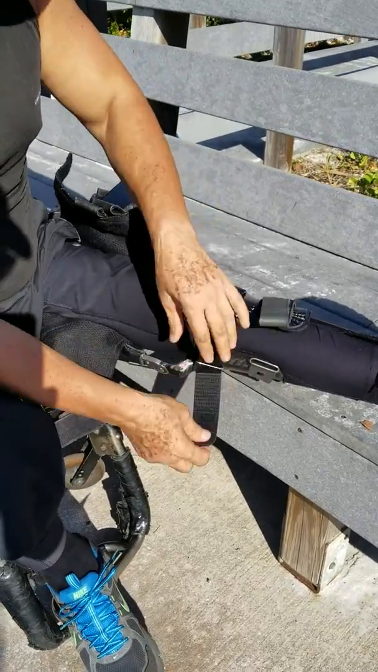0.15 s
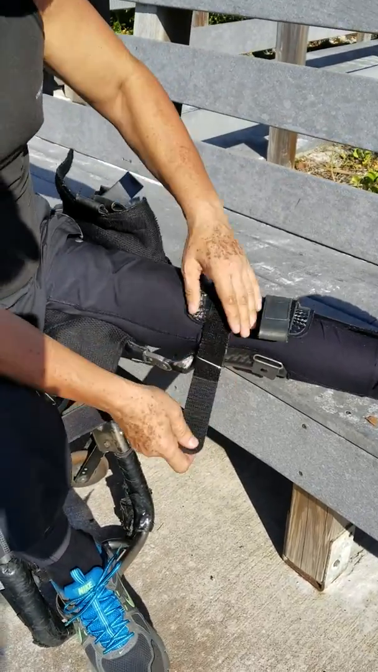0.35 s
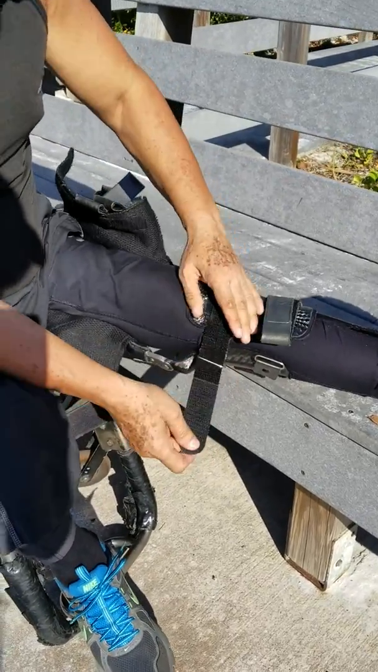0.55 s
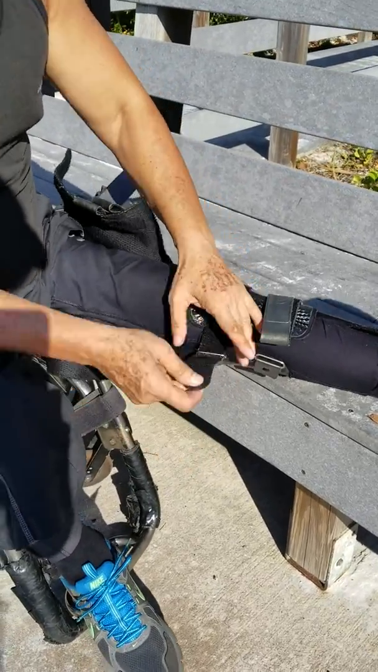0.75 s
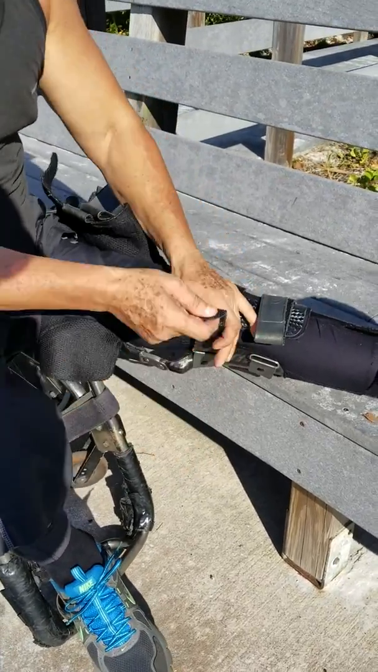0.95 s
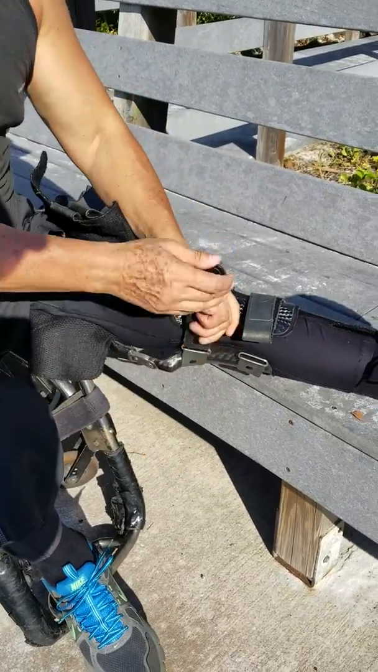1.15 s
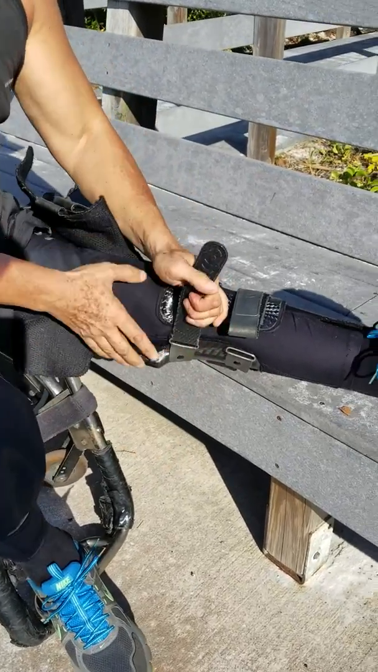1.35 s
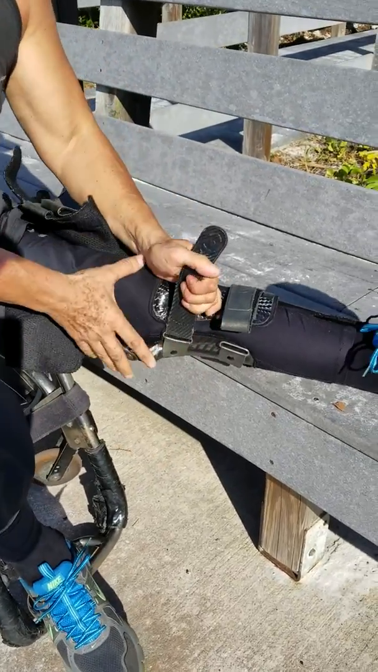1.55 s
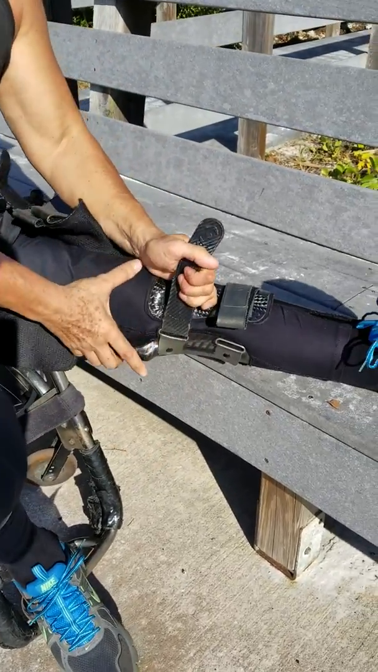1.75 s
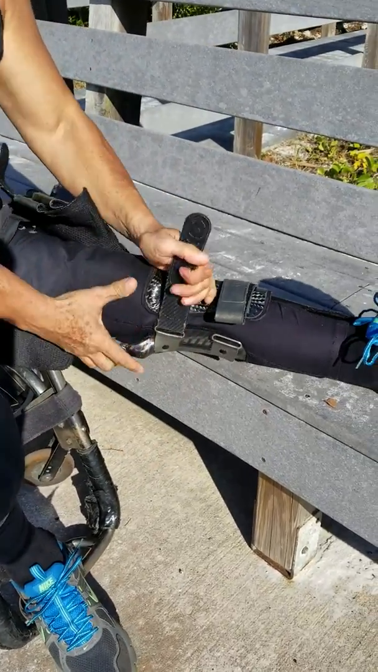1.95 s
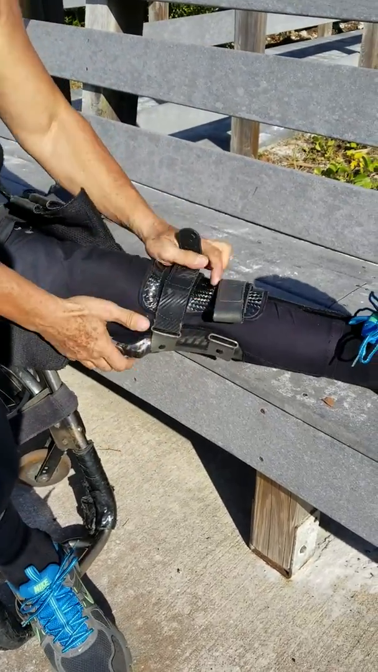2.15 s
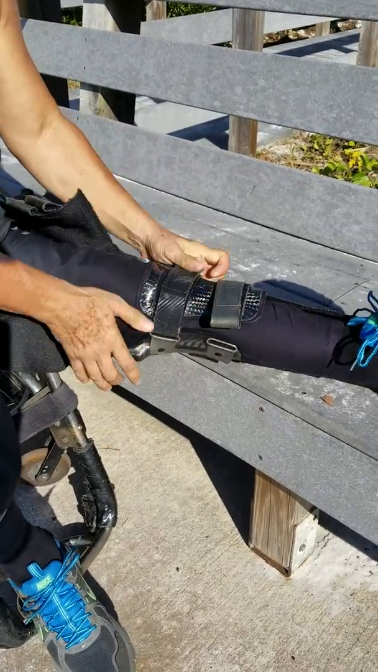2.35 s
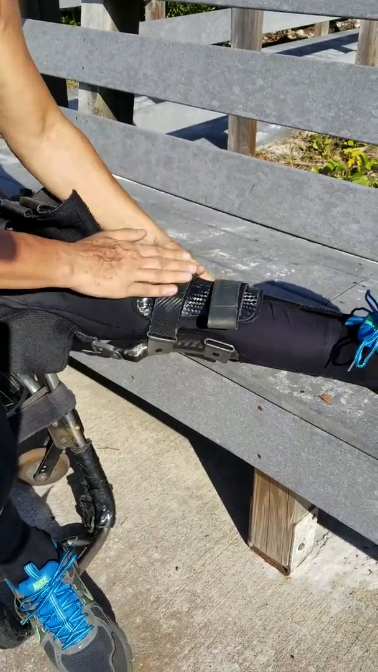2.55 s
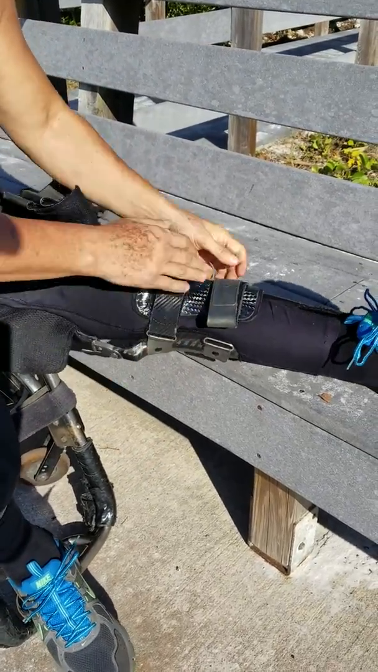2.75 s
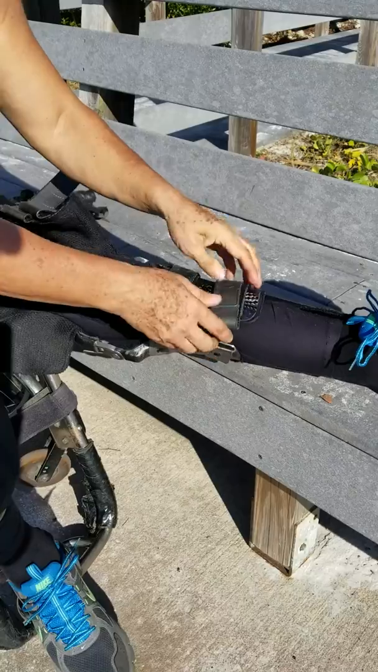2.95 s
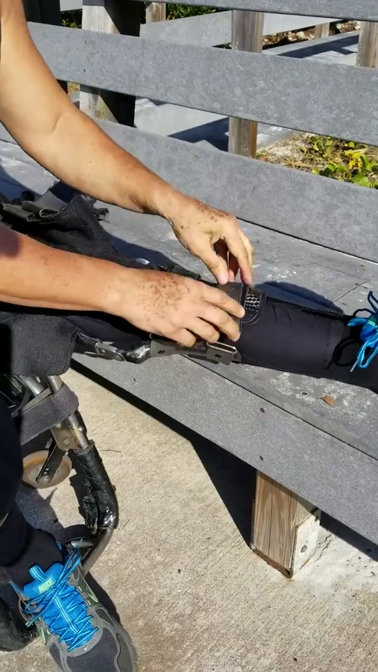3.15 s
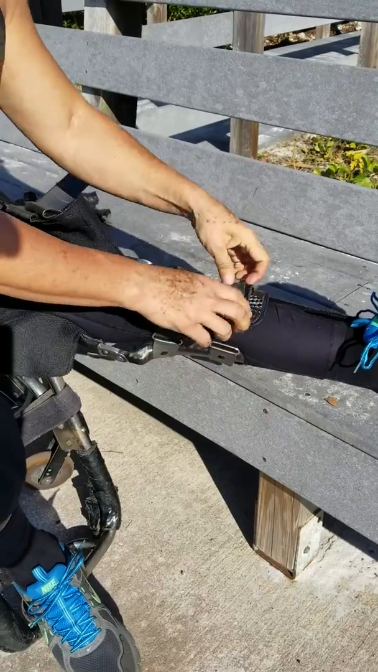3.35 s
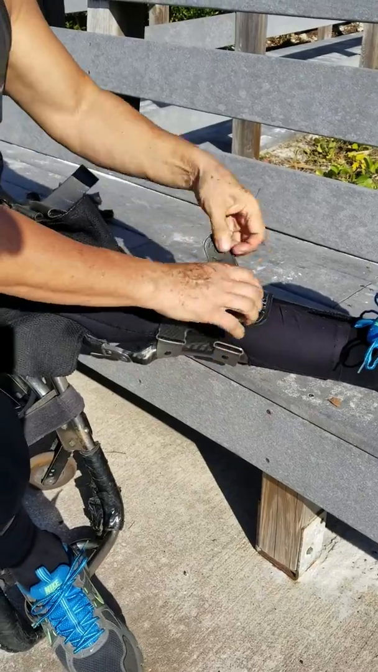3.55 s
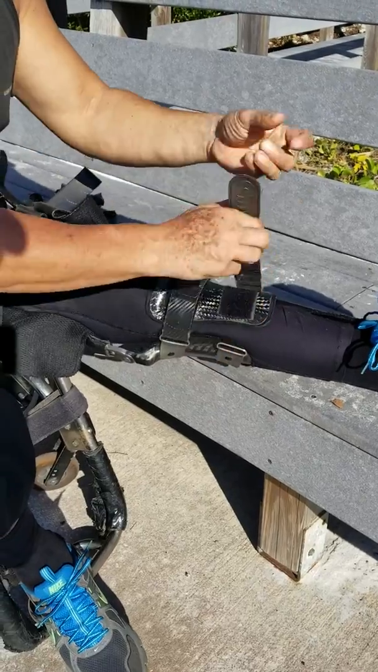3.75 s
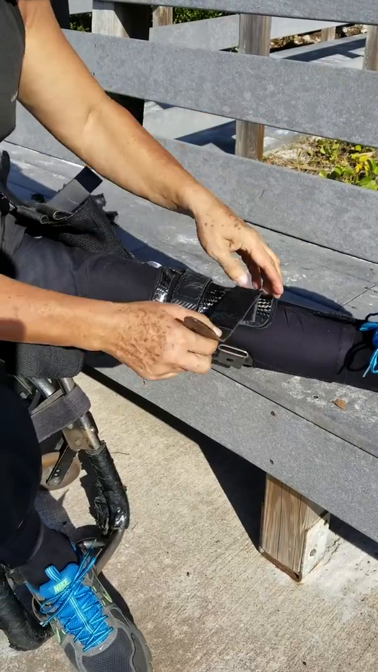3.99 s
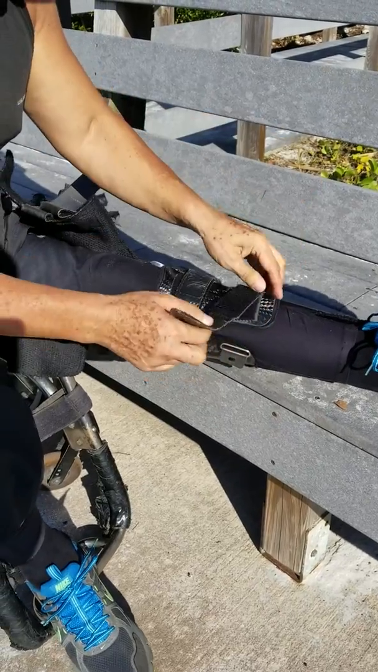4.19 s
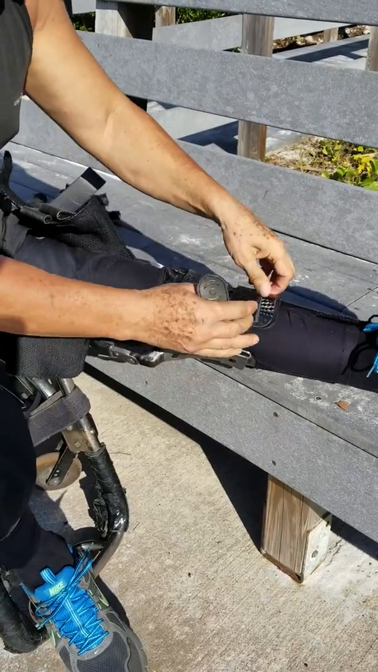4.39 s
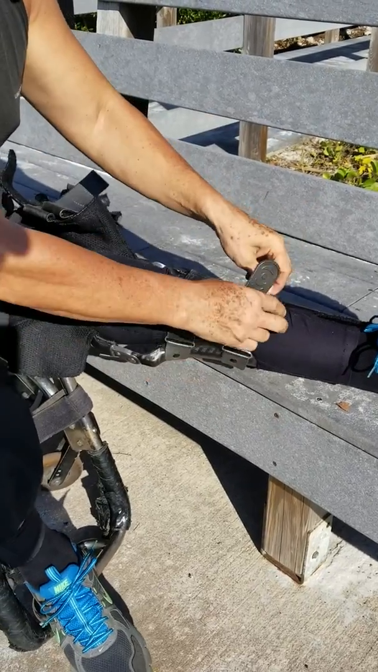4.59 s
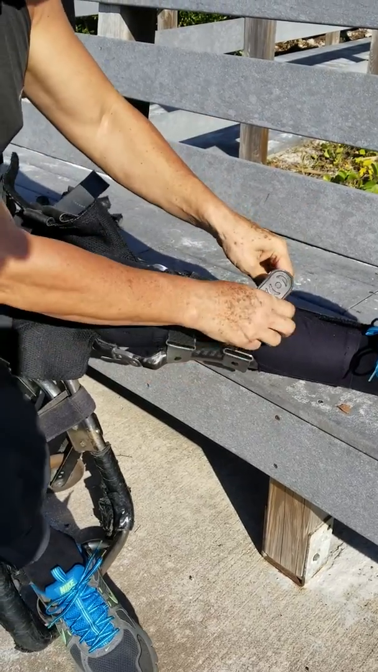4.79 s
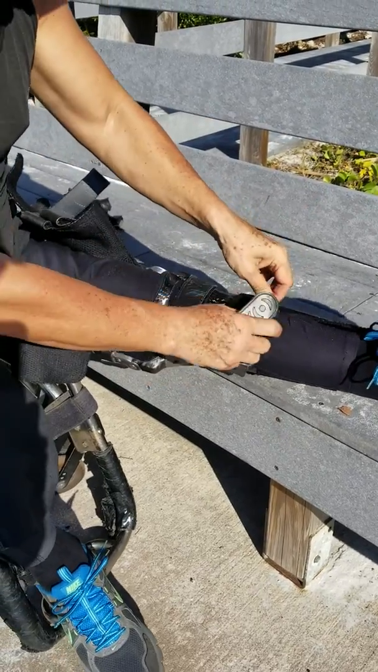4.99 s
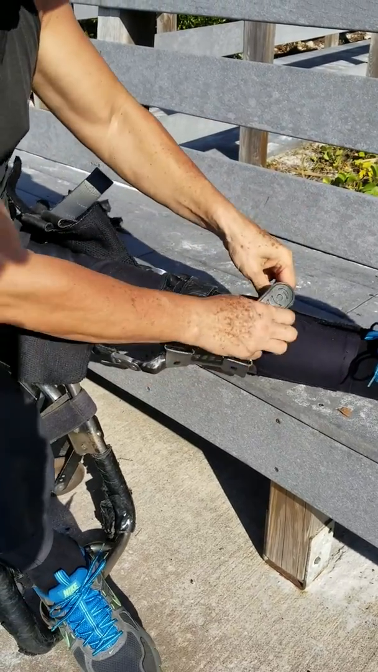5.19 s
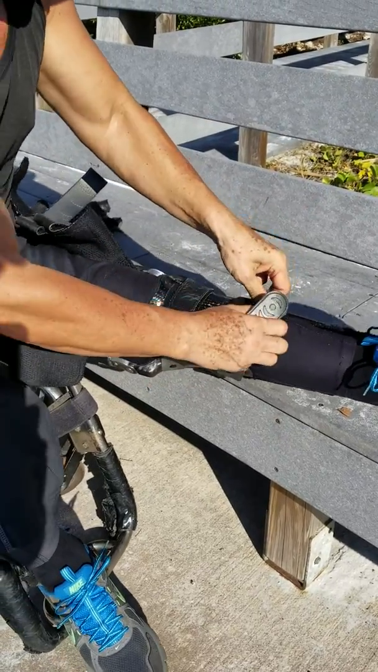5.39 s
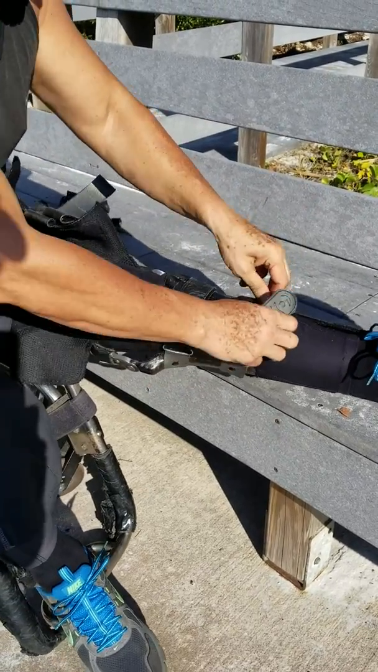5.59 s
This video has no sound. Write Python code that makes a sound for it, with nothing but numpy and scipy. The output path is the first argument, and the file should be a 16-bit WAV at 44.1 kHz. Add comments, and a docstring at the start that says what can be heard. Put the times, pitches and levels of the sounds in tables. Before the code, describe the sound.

The straps of a leg brace are handled close to the microphone, outdoors, over a faint steady low rumble. At the start a hook-and-loop strap peels a little. For the first two seconds webbing slides through its loop with a soft hiss, hands rub trouser cloth and buckles tick lightly. A buckle knocks on the plastic shell at about 2.1 seconds and again, harder, at 2.6. From 3.3 to 3.7 seconds comes the loudest sound, a crackling hook-and-loop rip that gives in jolts, rises in pitch and ends brightly. A faint distant hum swells around 4 seconds while the rubbing and sliding go on. Near 5 seconds there are a few tiny peels and one more sharp knock, then another short peel at 5.3 seconds, with small ticks and rustling until the end at about 5.6 seconds.

```python
"""The hook-and-loop straps of a leg brace are adjusted on an outdoor bench, over a faint distant rumble.
First webbing slides through its loop, hands rub cloth, buckles tick and a strap peels a little.
After two seconds a buckle knocks twice on the plastic shell. At 3.3 s comes one long rip:
a shower of tiny hook snaps that ring the strap and the shell. Then the rubbing and ticking go on,
with a few more small peels and a last knock near five seconds."""
import sys
import numpy as np
from scipy import signal
from scipy.fft import rfft, irfft, next_fast_len
from scipy.io import wavfile
from scipy.ndimage import uniform_filter1d, map_coordinates

SR = 44100
rng = np.random.default_rng(int(sys.argv[2]) if len(sys.argv) > 2 else 0)


def digitize_waveform(pressure):
    """Quantize a signal to 16-bit integers and store it at the path in sys.argv[1].

    Rows of a 2-D input are taken as channels; values are limited to [-1, 1].
    """
    field = np.atleast_2d(pressure).T
    bounded = np.clip(field, -1, 1)
    quanta = np.round(bounded * 32767).astype(np.int16)
    wavfile.write(sys.argv[1], SR, quanta)


N = 248283


def amp(db):
    """Turn decibels into a number to multiply by."""
    return 10 ** (np.asarray(db) / 20)


def unit(x):
    """Scale a signal to an average (rms) level of 1."""
    return x / np.sqrt(np.mean(x ** 2) + 1e-20)


def along(points, hz):
    """Read between (pitch_hz, value) rows, giving each octave equal room."""
    pitches, values = np.transpose(points)
    return np.interp(np.log(hz + 1), np.log(pitches), values)


def wobble(rate):
    """A smooth random curve through `rate` points a second."""
    points = rng.standard_normal(int(N * rate / SR) + 4)
    return map_coordinates(points, [np.arange(N) * rate / SR])


def filtered(x, response):
    """Turn each frequency up or down by response(hz)."""
    n = x.shape[-1]
    padded = next_fast_len(n + 8192)
    return irfft(rfft(x, padded) * response(np.fft.rfftfreq(padded, 1 / SR)), padded)[..., :n]


def coloured(x, colour):
    """Shape the tone of a sound with (pitch_hz, level_db) rows."""
    return filtered(x, lambda hz: amp(along(colour, hz)))


def bands(x, low_hz, high_hz):
    """Split a sound into equally strong low, middle and high parts."""
    below = lambda hz, edge: 1 / (1 + (hz / edge) ** 10)
    splits = [lambda hz: below(hz, low_hz),
              lambda hz: (1 - below(hz, low_hz)) * below(hz, high_hz),
              lambda hz: 1 - below(hz, high_hz)]
    return np.array([unit(filtered(x, split)) for split in splits])


def swell(peak_s, rise_s, fall_s):
    """A rounded rise and fall, 9 dB down at rise_s before its peak and fall_s after it."""
    t = np.arange(N) / SR - peak_s
    away = np.abs(t / np.where(t < 0, rise_s, fall_s))
    gain, near = np.zeros(N), away < 4
    gain[near] = amp(-9 * away[near] ** 1.6)
    return gain


def add(track, start_s, sound):
    """Mix a sound into the track at start_s."""
    part = track[round(start_s * SR):][:len(sound)]
    part += sound[:len(part)]


# How alike the background is on the left and right: pitch_hz, likeness (1 = the same)
STEREO_LIKENESS = [(25, 0.6), (50, 0.98), (70, 0.8), (300, 0.96), (1000, 0.35), (2500, 0.14),
                   (10000, 0.039)]
def wide_noise(colour):
    """Noise from all around: much alike on both sides in the bass, different in the treble."""
    def response(hz):
        angle = np.arccos(np.clip(along(STEREO_LIKENESS, hz), -1, 1)) / 2
        return amp(along(colour, hz)) * [np.cos(angle), np.sin(angle)]
    mid, side = filtered(rng.standard_normal((2, N)), response)
    return unit(np.array([mid + side, mid - side]))


# The tone of the distant rumble and of the open air: pitch_hz, level_db
RUMBLE_COLOUR = [(12, -50.5), (20, -41), (27, -20), (41, 3.5), (49, -7.5), (59, 1.5), (81, 6.5), (107, 4.5),
                 (124, -7.5), (146, -4.5), (186, -7.5), (221, -39), (260, -15), (340, -25), (570, -120)]
AIR_COLOUR = [(150, -15), (320, -2), (520, -17), (850, -14), (1080, -14.5), (1190, -6.5), (1350, -19),
              (2500, -25.5), (5000, -25.5), (15500, -30.5)]
# The notes of a distant hum: pitch_hz, level_db, swell_db
HUM_TONES = [(61.6, -64.5, 2), (138.5, -72, 8.5)]
def background():
    """A low rumble, faint open air and a wavering hum that swells once."""
    t = np.arange(N) / SR
    rise = swell(peak_s=3.96, rise_s=0.47, fall_s=0.48)
    hum = np.zeros(N)
    for pitch_hz, level_db, swell_db in HUM_TONES:
        gain = amp(level_db + swell_db * rise + 2.7 * wobble(3.36))
        hum += gain * np.sin(2 * np.pi * pitch_hz * t + 0.97 * wobble(7.4))
    return amp(-60.5) * wide_noise(RUMBLE_COLOUR) + amp(-71.5) * wide_noise(AIR_COLOUR) + hum


# The tone of nearby echoes, against the direct sound: pitch_hz, level_db
ECHO_COLOUR = [(200, -9.5), (600, -6.5), (1300, 3.5), (3000, 5.5), (8000, 5.5)]
def with_echoes(x, echoes):
    """Add echoes to the direct sound, which reaches the left side just before the right."""
    direct = np.array([np.roll(x, -2), np.roll(x, 2)])
    return direct + coloured(echoes, ECHO_COLOUR)


def snaps(rate, spread_db):
    """Tiny clicks of random size at random moments, about `rate` a second."""
    happens = rng.random(N) < rate / SR
    return happens * rng.choice([-1, 1], N) * amp(spread_db * rng.standard_normal(N).clip(-2, 2))


def scattered(x, fade_s):
    """Each snap comes from its own spot and trails its own echoes, which drop 60 dB in fade_s."""
    fade = amp(-60 * np.arange(SR // 20) / SR / fade_s) ** 2
    energy = np.abs(signal.oaconvolve(x ** 2, fade / fade.sum())[:N])
    return with_echoes(x, np.sqrt(energy) * rng.standard_normal((2, N)))


def tightening(x, pitch_path, lift_db, octaves):
    """A broad ring that follows how tight the strap is, along (time_s, pitch_hz) rows."""
    hz, times, spectrum = signal.stft(x, SR, nperseg=256)
    ring_hz = np.interp(times, *np.transpose(pitch_path))
    away = np.log2((hz[:, None] + 1) / ring_hz) / octaves
    return signal.istft(spectrum * amp(lift_db * np.exp(-away ** 2)), SR, nperseg=256)[1][:, :N]


def flexing(x, depth_db):
    """The tone drifts in patches as the fabric bends and the hands shade it."""
    spectrum = signal.stft(x, nperseg=512)[2]
    patches = uniform_filter1d(rng.standard_normal(spectrum.shape[1:]), size=4, axis=0)  # over pitch
    patches = uniform_filter1d(patches, size=22, axis=1)  # over time
    return signal.istft(spectrum * amp(depth_db * unit(patches)), nperseg=512)[1][:, :N]


# Webbing drawn through its loop: peak_s, rise_s, fall_s, hiss_db, scrape_db (added to hiss_db)
WEBBING_SLIDES = [(.03, 0.07, .08, -67.5, -11.5), (.22, 0.12, 0.028, -65, -9), (.69, 0.19, 0.13, -62.5, -7),
                  (1.11, 0.016, 0.02, -54, -27), (1.17, 0.024, .08, -68, -20), (1.4, .03, 0.045, -66, -26),
                  (1.62, 0.2, 0.19, -73.5, -17), (2.04, 0.14, 0.15, -67, -4),
                  (2.19, 0.091, 0.07, -58.5, -2.5), (2.36, .1, 0.075, -63, -6),
                  (2.51, 0.086, 0.099, -64.5, -2.5), (2.66, 0.039, 0.096, -68.5, 2),
                  (3.075, 0.037, 0.09, -79, 2), (3.8, 0.3, 0.03, -68.5, -3.5),
                  (4.06, 0.062, 0.069, -66.5, -7), (4.241, 0.039, .03, -66.5, -1.5),
                  (4.335, 0.034, 0.038, -61, -5), (4.5, 0.022, 0.12, -70.5, -10.5),
                  (4.608, .012, .02, -70, 10), (4.72, 0.031, 0.072, -64, -5.5),
                  (5.04, 0.29, 0.13, -66.5, -2.5), (5.46, .09, 0.16, -69, -0.5)]
# The webbing rings higher as it is drawn short: time_s, pitch_hz
WEBBING_PITCH = [(0.55, 406), (1.0, 434), (1.10, 510), (1.16, 770), (1.22, 1110), (1.32, 430)]
# A hand rubs the trouser cloth: peak_s, rise_s, fall_s, level_db
HAND_RUBS = [(.12, 0.087, .12, -63), (.555, 0.043, 0.098, -70), (.78, .2, .2, -66), (1.06, .075, .05, -63),
             (1.15, 0.064, 0.076, -58.5), (2.28, 0.28, 0.28, -69), (2.68, 0.081, 0.13, -70.5),
             (3.18, 0.22, 0.55, -70), (3.74, 0.24, 0.1, -71.5), (4.03, 0.085, 0.5, -69.5),
             (4.325, 0.017, 0.025, -66), (4.76, 0.11, 0.13, -70), (5.16, 0.2, 0.15, -68),
             (5.47, 0.11, 0.094, -67.5)]
# The fingers never quite rest: low_db, middle_db, high_db
FIDGET_DB = [-77.5, -80, -83]
# The tone of rubbed cloth: pitch_hz, level_db
CLOTH_COLOUR = [(120, -15.5), (250, 0), (420, 3.5), (700, -4.5), (1150, -7), (2000, -12), (3000, -10),
                (4400, -12.5), (6300, -16.5), (8300, -15.5), (11000, -20), (15800, -21.5)]
def rubs():
    """Fibres catch and slip under hands and webbing: a smooth hiss with a little crackle in it."""
    pressure = amp(2.5 * wobble(22))  # the palm presses unevenly
    hands = pressure * sum(amp(level_db) * swell(*timing) for *timing, level_db in HAND_RUBS)
    palm_bands = amp([[0], [-14.5], [-13]])  # a soft palm gives mostly the low band
    power = amp(FIDGET_DB)[:, None] ** 2 + (palm_bands * hands) ** 2
    for *timing, hiss_db, scrape_db in WEBBING_SLIDES:
        power[1:] += (amp([[hiss_db + scrape_db], [hiss_db]]) * swell(*timing)) ** 2
    fibres = rng.standard_normal(N) + amp(-6) * unit(snaps(160, spread_db=5))
    rub = scattered(fibres * amp(0.64 * wobble(41)), fade_s=0.011)
    rub = tightening(coloured(rub, CLOTH_COLOUR), WEBBING_PITCH, lift_db=8.5, octaves=0.58)
    rub = flexing(rub, depth_db=2.4)
    return np.sum(np.sqrt(power)[:, None] * bands(rub, 810, 3760), axis=0)


# Light ticks of buckles and single hooks: start_s, low_db, middle_db, high_db
TICKS = [(0.0488, -64, -59, -56.5), (0.2114, -74, -53, -60), (.2424, -82, -74, -65),
         (1.595, -78, -87, -62.5), (1.7702, -66, -66.5, -71), (1.8975, -58, -79, -70),
         (2.022, -59.5, -60.5, -67), (2.073, -81, -68, -57.5), (2.365, -82, -75, -52),
         (2.3898, -84, -79, -56), (2.4196, -51, -66, -73), (2.5313, -62, -57, -60),
         (2.7389, -57, -60.5, -72), (3.266, -82, -58, -54), (3.2848, -83, -53, -54.5),
         (3.8332, -69.5, -70, -58), (4.4819, -85, -69, -63), (4.5955, -54.5, -55.5, -65),
         (4.6888, -59, -58, -75), (4.8923, -76, -61, -56), (5.082, -54.5, -65, -78), (5.289, -66, -52, -55),
         (5.308, -53, -53, -48.5), (5.403, -48.5, -55, -63), (5.469, -56, -60, -74),
         (5.5232, -81, -68, -55.5)]
# The tone of a hard contact, for ticks and knocks: pitch_hz, level_db
CRACK_COLOUR = [(200, -16), (700, -10.5), (1300, 1.5), (1850, -3), (2600, 1), (3400, -3), (4200, -3),
                (5300, -12.5), (10000, -14.5), (15500, -21.5)]
def ticks():
    """Small dry contacts: bursts of noise whose treble dies first."""
    track, t = np.zeros(N), np.arange(SR // 12) / SR
    fade_s = np.array([[0.04], [0.03], [0.025]])
    fade = amp(-60 * t / fade_s) * (1 - np.exp(-t / 0.00041))
    for start_s, *levels_db in TICKS:
        burst = bands(coloured(rng.standard_normal(len(t)), CRACK_COLOUR), 1130, 4640)
        add(track, start_s, np.sum(amp(levels_db)[:, None] * fade * burst, axis=0))
    return track


def surroundings(x, near_fade_s, far_fade_s, far_db, poses=4):
    """Echoes from arms, leg and bench follow each tap and shift as the hands move."""
    t = np.arange(SR // 6) / SR
    near, far = rng.standard_normal((2, poses, 2, len(t)))
    near *= amp(-60 * t / near_fade_s)
    far *= amp(-60 * t / far_fade_s) * (1 - np.exp(-t / 0.011))
    tails = (unit(near) + amp(far_db) * unit(far)) / np.sqrt(len(t))
    blend = np.array([wobble(14) for _ in range(poses)])
    blend /= np.linalg.norm(blend, axis=0)
    echoes = signal.oaconvolve((blend * x)[:, None], tails, axes=2).sum(axis=0)[:, :N]
    return with_echoes(x, echoes)


# The tone of one hook snapping free: pitch_hz, level_db
HOOK_COLOUR = [(130, -20), (300, -5), (480, 4), (680, -1.5), (950, 7), (1500, 0), (2400, -2.5),
               (4200, -0.5), (5200, -2), (6400, -7), (8300, -5), (11000, -11.5), (13500, -7),
               (16000, -18.5)]
# Where the snaps make the strap and shell ring: pitch_hz, width_hz, level_db
STRAP_RINGS = [(525, 70, -4), (900, 46, -3), (1180, 70, -7), (1730, 80, -3), (2110, 46, -4), (2330, 100, 1),
               (2880, 60, -2), (3310, 90, -1), (3790, 50, -4), (3990, 50, -2), (4340, 46, -4)]
def hooks(pull, least_rate, more_rate, uneven_db, spread_db, ring_db):
    """Hooks let go of their loops and ring the strap; a harder pull frees more each second."""
    def response(hz):
        ring = sum(amp(level_db) ** 2 / (1 + (2 * (hz - pitch_hz) / width_hz) ** 2)
                   for pitch_hz, width_hz, level_db in STRAP_RINGS)
        return amp(along(HOOK_COLOUR, hz)) * np.sqrt(1 + amp(ring_db) ** 2 * ring)
    rate = least_rate + more_rate * np.sqrt(pull / pull.max())
    rows_letting_go = amp(uneven_db * wobble(460))
    shower = snaps(rate, spread_db) / np.sqrt(rate) * rows_letting_go
    return filtered(scattered(shower, fade_s=0.022), response)


# Small peels: peak_s, rise_s, fall_s, rasp_db, body_db, fizz_db (the last two are added to rasp_db)
PEELS = [(.057, 0.0096, .02, -65, -4, -7), (0.166, 0.06, 0.066, -57, -6.5, -7),
         (3.265, 0.021, .02, -67.5, -20, 3), (3.751, 0.012, .012, -51, -15.5, 1.5),
         (4.909, 0.014, 0.0085, -57, -6, 1), (4.939, 0.0069, 0.012, -50, -2, 0.5),
         (4.998, 0.0066, 0.013, -56, 2.5, -3.5), (5.312, 0.0147, 0.044, -49, -1.5, -5)]
def peels():
    """A slack strap peels and rings only a little: low body, middle rasp and high fizz."""
    gains = sum(amp([[rasp_db + body_db], [rasp_db], [rasp_db + fizz_db]]) * swell(*timing)
                for *timing, rasp_db, body_db, fizz_db in PEELS)
    shower = hooks(gains[1], least_rate=700, more_rate=1800, uneven_db=0.5, spread_db=2, ring_db=0.5)
    shower = flexing(shower, depth_db=2.4)
    return np.sum(gains[:, None] * bands(shower, 1500, 5700), axis=0)


# A buckle hits the shell: start_s, crack_db, crack_fade_s, thud_db, treble_db, graze_db,
# bounce_delay_s, bounce_db (graze and bounce levels are against the main blow)
KNOCKS = [(2.1367, -42.5, .016, -50, -1, -7, 0.0038, -9), (2.5964, -34.5, .016, -32, 1, -5.5, .0055, -6.5),
          (4.9644, -33, .009, -39, -9, -22, 0.002, -9)]
# The notes of the struck shell: pitch_hz, level_db, fade_s (time to drop 60 dB)
SHELL_NOTES = [(332, -17.5, 0.08), (497, -8, 0.081), (700, -3, 0.034), (820, 3.5, 0.031), (1190, -9, 0.042),
               (1290, -23.5, 0.051), (1674, -12, 0.058)]
def knocks():
    """A buckle grazes, hits and bounces: each a sharp push, a crack and a dull plastic thud."""
    track, t = np.zeros(N), np.arange(SR // 8) / SR
    contact = t / 0.00036
    push = amp(13.5) * (1 - contact) * np.exp(-contact) * np.minimum(contact, 1)
    for start_s, crack_db, crack_fade_s, thud_db, treble_db, graze_db, delay_s, bounce_db in KNOCKS:
        treble = [(3500, 0), (5500, treble_db)]
        response = lambda hz: amp(along(CRACK_COLOUR, hz) + along(treble, hz))
        touches = [(-0.0042, graze_db, 0.1), (0, 0, 1), (delay_s, bounce_db, 1)]
        for offset_s, touch_db, thud_share in touches:
            crack = unit(filtered(rng.standard_normal(len(t)), response)) * amp(-60 * t / crack_fade_s)
            thud = sum(amp(level_db + rng.normal(0, 1) - 60 * t / fade_s) * np.sin(2 * np.pi * hz * t)
                       for hz, level_db, fade_s in SHELL_NOTES)
            knock = amp(crack_db) * (crack + push) + thud_share * amp(thud_db) * thud
            add(track, start_s + offset_s, amp(touch_db) * knock)
    bass_cut = signal.butter(4, 310, "high", fs=SR, output="sos")  # the shell is too small to give bass
    return signal.sosfilt(bass_cut, track)


# The shape of the long rip: time_s, pull_db, body_db (low band against the pull)
RIP_PULL = [(3.31, -73, -4), (3.316, -62, -13), (3.378, -60, -20), (3.39, -43.5, -16), (3.404, -51, -11),
            (3.434, -47.5, -16), (3.46, -44, -1.5), (3.512, -44, -6.5), (3.586, -28.5, -8),
            (3.632, -39, -3), (3.65, -39, -14), (3.674, -63, -6.5), (3.71, -80, 6)]
# A patch of hooks holds, then gives all at once: start_s, jolt_db
RIP_JOLTS = [(3.315, 4), (3.387, 3.5), (3.448, 5.5)]
# The free length of strap rings higher as it tightens: time_s, pitch_hz
STRAP_PITCH = [(3.39, 1700), (3.47, 1770), (3.50, 2500), (3.56, 2750), (3.585, 3500), (3.60, 4100),
               (3.625, 2800)]
def rip():
    """The strap gives in jolts, tightens under a growing pull and comes free."""
    t = np.arange(N) / SR
    times, pull_db, body_db = np.transpose(RIP_PULL)
    jolts_db = np.zeros(N)
    for start_s, jolt_db in RIP_JOLTS:
        hush_then_burst = np.where(t < start_s, -0.99, 1)
        jolts_db += jolt_db * hush_then_burst * np.exp(-np.abs(t - start_s) / 0.0078)
    pull = amp(np.interp(t, times, pull_db, left=-120, right=-120) + jolts_db + 3.5)
    body = pull * amp(np.interp(t, times, body_db) - 0.5)
    flare_db = 5 * swell(peak_s=3.615, rise_s=0.035, fall_s=0.05)  # the last rows tear off brightly
    fizz = amp(flare_db - 8.5) * pull.max() * (pull / pull.max()) ** 0.82  # grows slower than the pull
    shower = hooks(pull, least_rate=500, more_rate=5000, uneven_db=2.3, spread_db=3.5, ring_db=12)
    shower = tightening(shower, STRAP_PITCH, lift_db=6, octaves=0.43)
    shower = flexing(shower, depth_db=2)
    return np.sum(np.array([body, pull, fizz])[:, None] * bands(shower, 1600, 5500), axis=0)


def scene():
    """The straps and buckles, close by and a little louder on the right, in the open air."""
    buckles = surroundings(ticks() + knocks(), near_fade_s=0.025, far_fade_s=0.14, far_db=-11.5)
    brace = rip() + peels() + rubs() + buckles
    return brace * amp([[-1.1], [1.0]]) + background()


def record(dry):
    """Cut off the very highest treble."""
    return filtered(dry, lambda hz: hz < 15900)


dry = scene()
out = record(dry)
digitize_waveform(out)
```